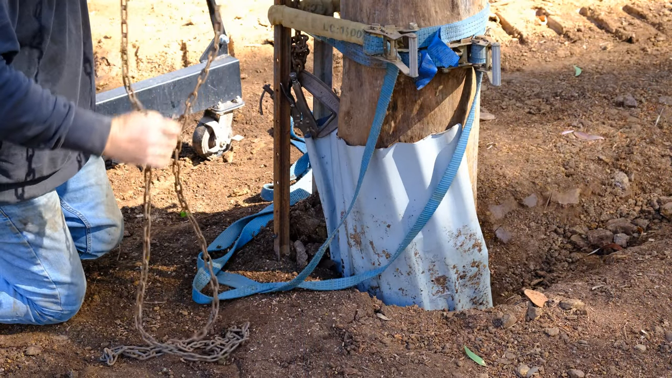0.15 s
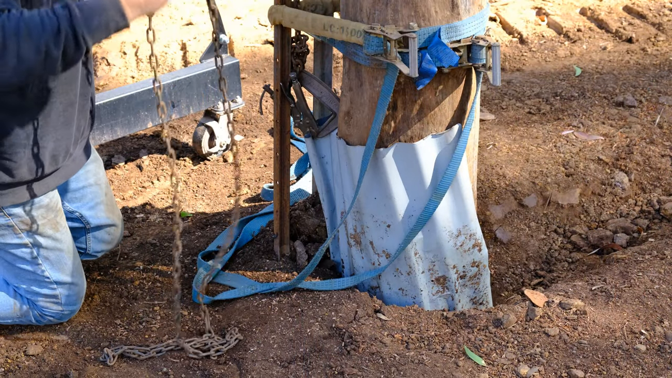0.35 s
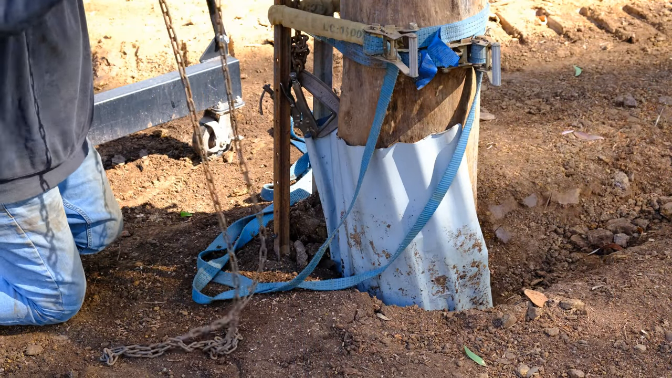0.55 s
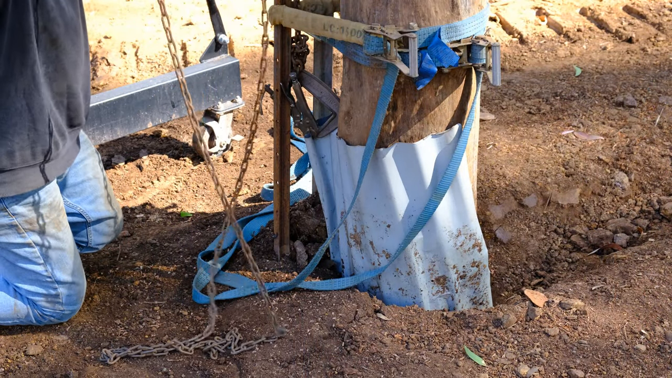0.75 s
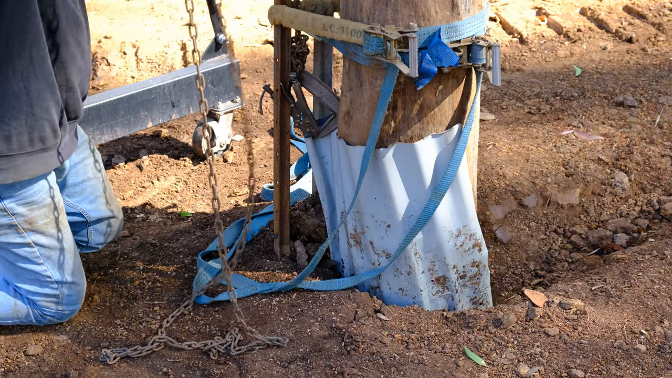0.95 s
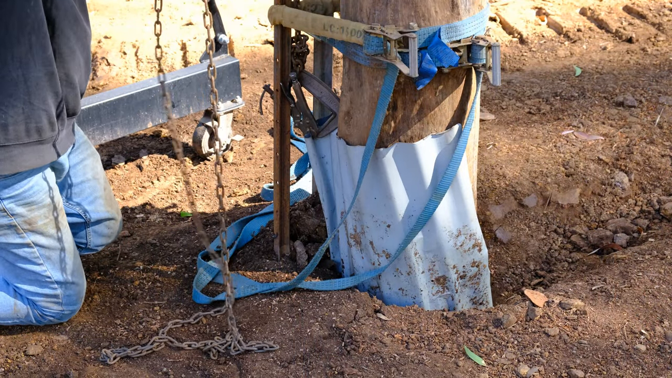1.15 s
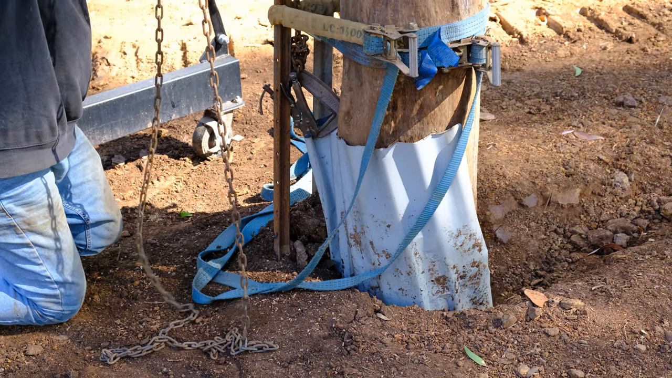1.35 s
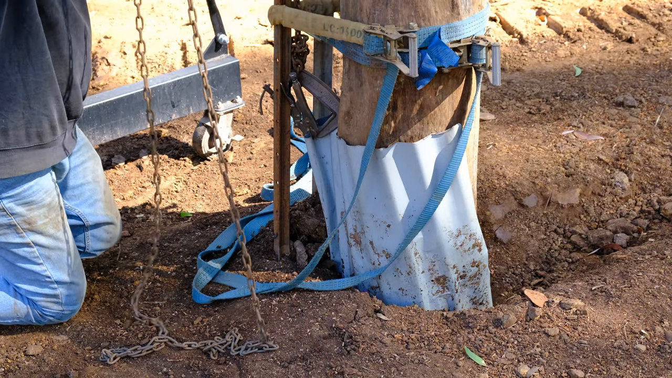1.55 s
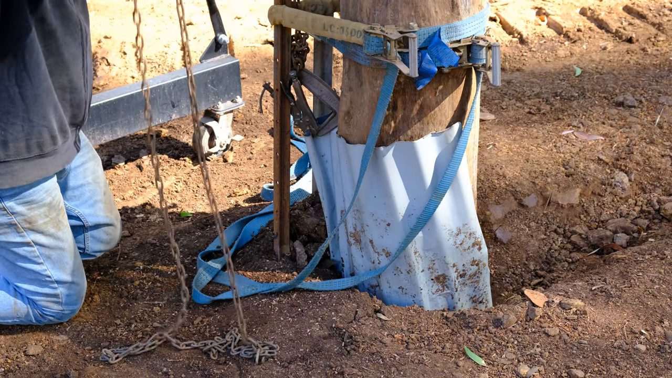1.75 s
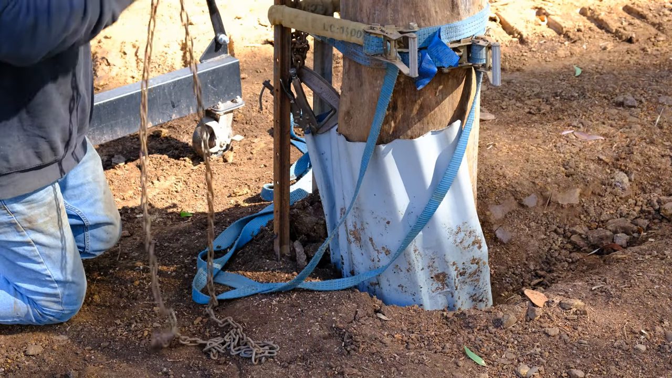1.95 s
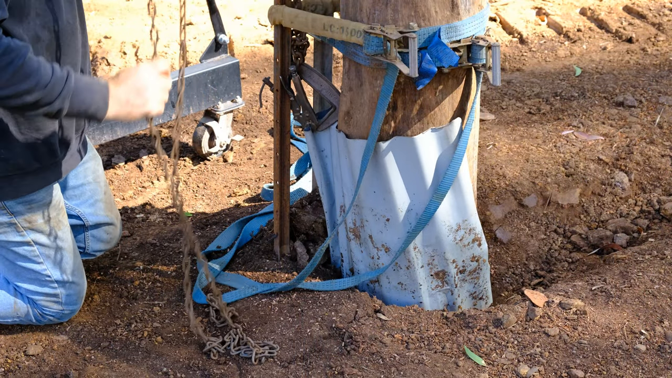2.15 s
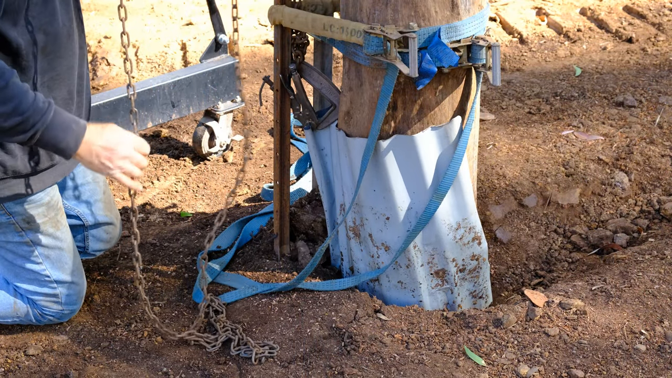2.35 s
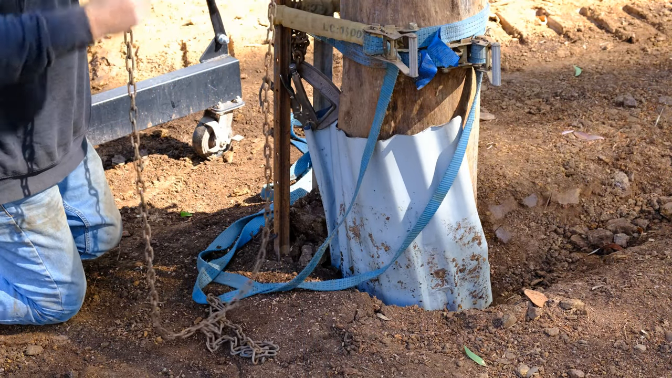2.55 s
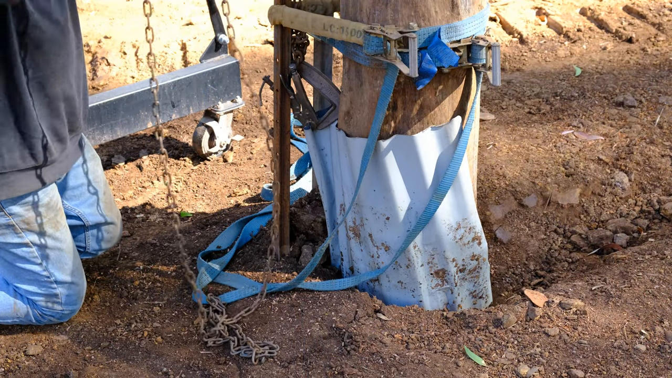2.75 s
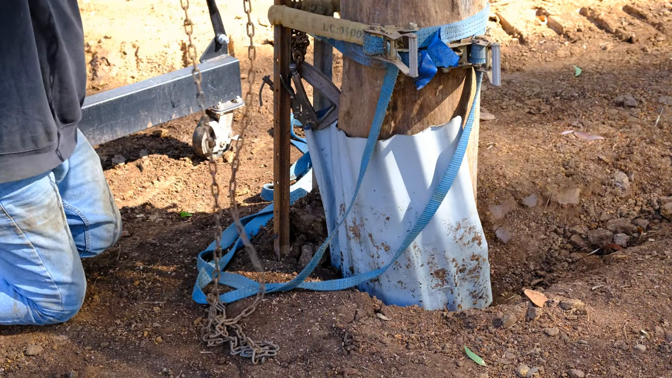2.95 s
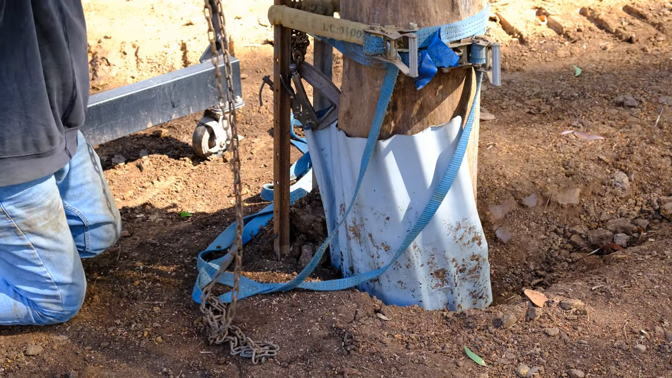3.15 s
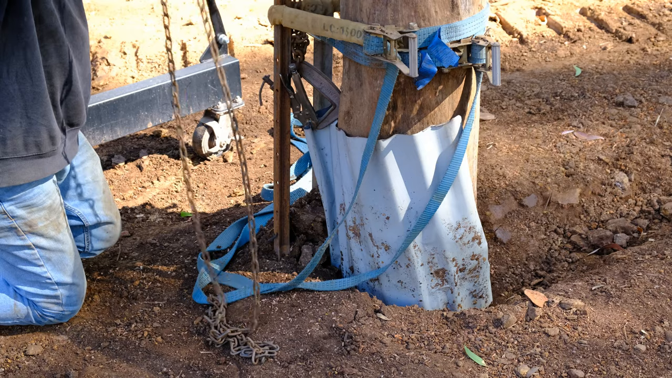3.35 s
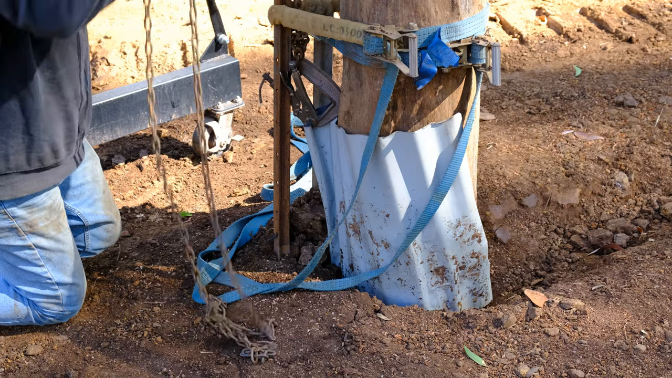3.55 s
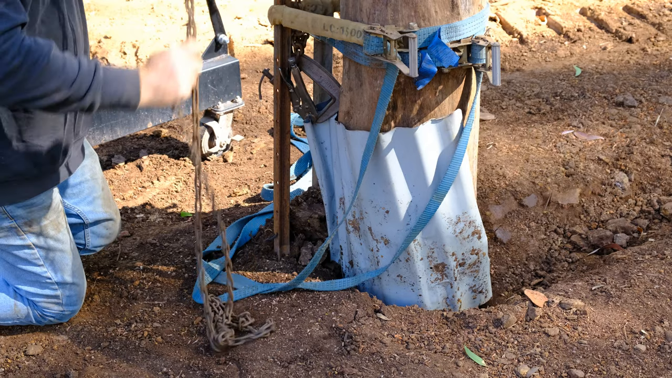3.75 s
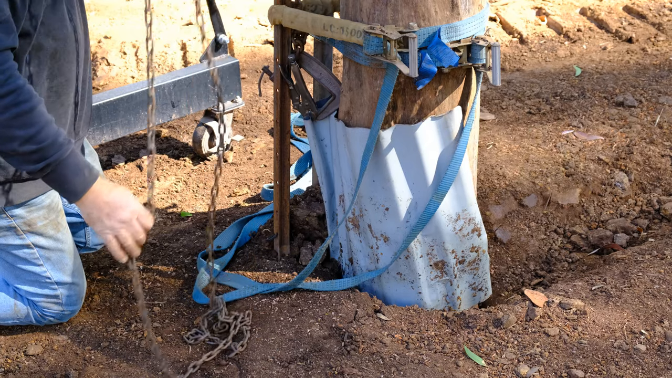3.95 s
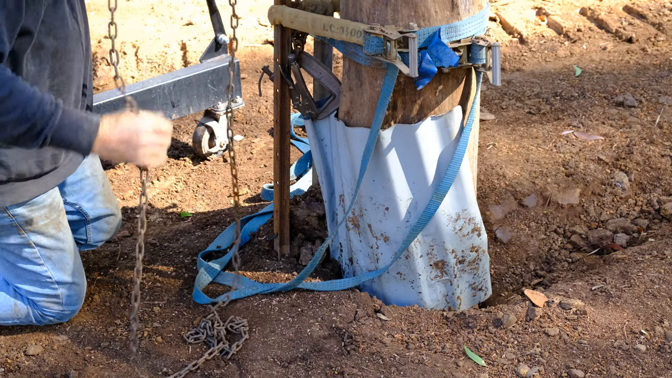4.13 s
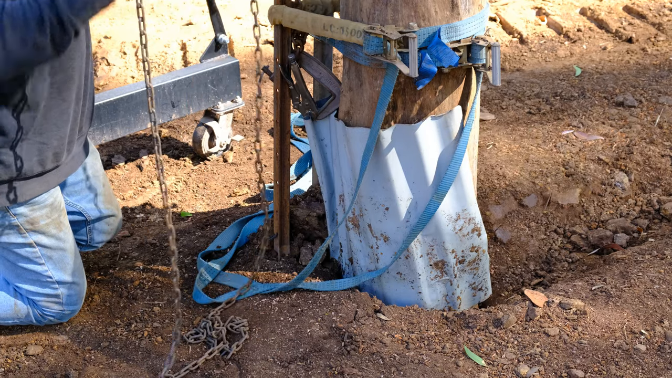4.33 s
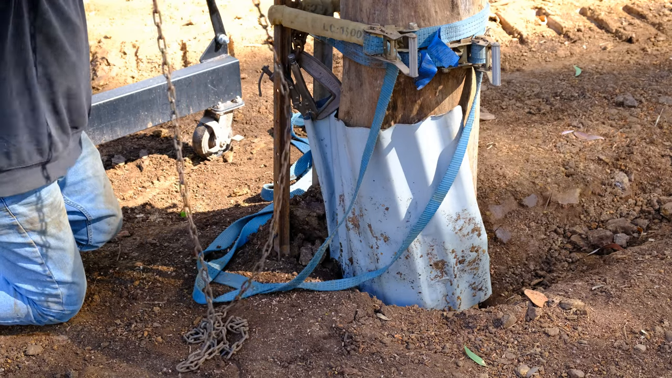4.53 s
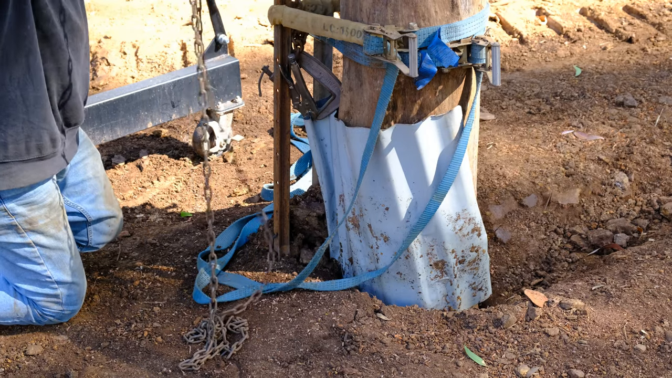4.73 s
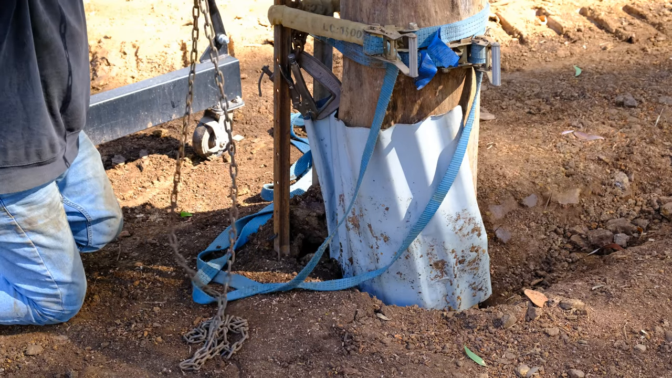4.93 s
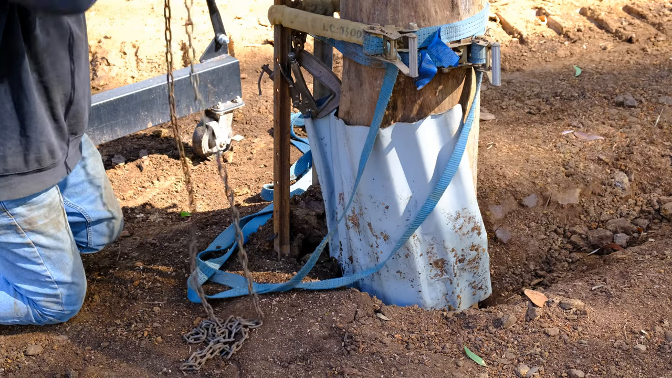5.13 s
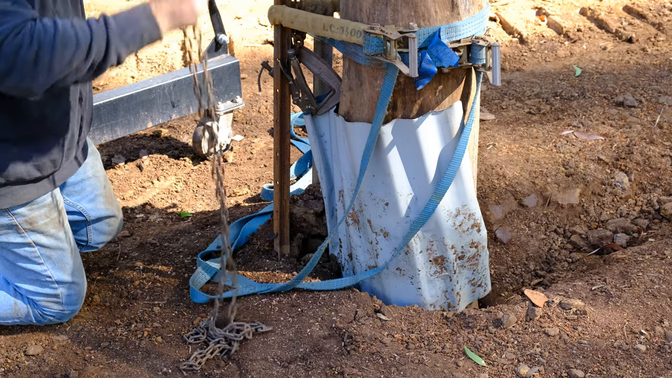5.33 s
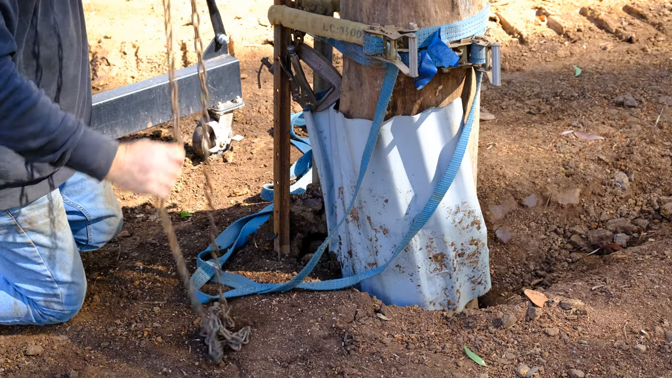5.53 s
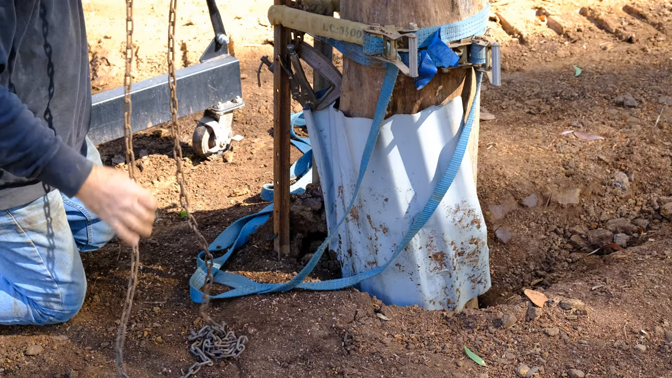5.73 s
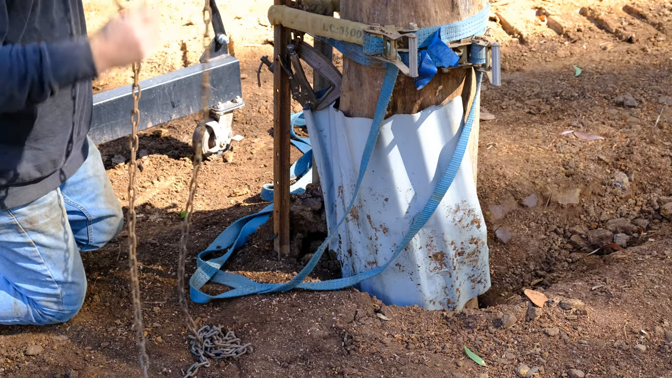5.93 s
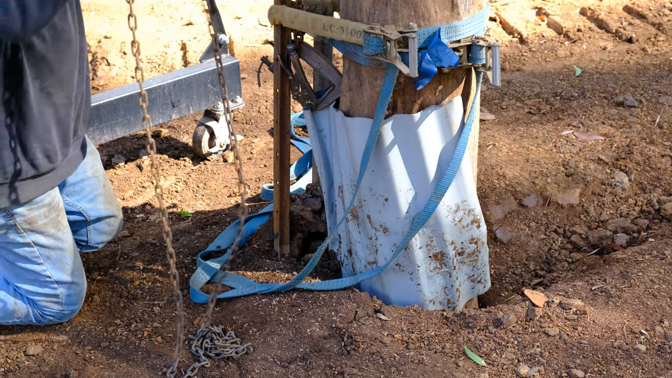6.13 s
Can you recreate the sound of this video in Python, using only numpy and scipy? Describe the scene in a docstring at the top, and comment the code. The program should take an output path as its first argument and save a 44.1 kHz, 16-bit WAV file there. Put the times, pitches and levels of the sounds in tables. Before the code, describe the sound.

Close and dry outdoors, a ratchet is already clicking as it stops, then a clank and loose chain ticks. Three further pulls follow, each a rapid accelerating metallic clatter that slows to a stop, ringing the steel housing. Between them come isolated clanks, cloth and soil rustle, bright link jingles, one sharp strap snap on wood, and tiny far bird whistles over quiet air and soft wind.

```python
"""A hand chain is hauled through a hoist outdoors in pulls: the pawl clicks over ratchet teeth, links rattle the steel housing.
Wheel speed times the clicks and the seating links; shaped noise drives the damped modes of the steel.
The housing also clanks, a loaded strap snaps on a wooden post as decaying sines, and loose links tick as noise bursts.
A far bird gives falling whistles; rustle, fizz, outdoor air and wind are filtered noise.
"""
import sys
import numpy as np
from scipy import signal
from scipy.fft import rfft, irfft, next_fast_len
from scipy.io import wavfile
from scipy.ndimage import uniform_filter1d

SR = 44100
rng = np.random.default_rng(int(sys.argv[2]) if len(sys.argv) > 2 else 0)


def unload_wav(signal):
    """Save mono or channel-first audio to the path in sys.argv[1] as 16-bit WAV at rate SR, clipped to [-1, 1]."""
    wavfile.write(
        sys.argv[1],
        SR,
        np.round(np.clip(np.atleast_2d(signal).T, -1, 1) * 32767).astype(np.int16),
    )


def how_loud(loudness_db):
    """Turn decibels into a plain amplitude multiplier (0 dB gives 1, 20 dB gives 10)."""
    steps = np.asarray(loudness_db, float) / 20
    return 10 ** steps


N = 272538
SIZE = next_fast_len(N + SR // 4)
HZ = np.fft.rfftfreq(SIZE, 1 / SR)
TIME = np.arange(N) / SR
BLOW_TIME = np.arange(SR // 8) / SR
CRUISE_PER_S = 70  # reference wheel speed, teeth per s
# Levels and decays in the tables are relative: the functions that play them weight them further.


def evened(x):
    """Normalization: scales a signal to rms 1."""
    return x / np.sqrt(np.mean(x ** 2) + 1e-20)


def read(points):
    """Spectral interpolation: a table read at every bin on a log-frequency axis."""
    hz, value = np.transpose(points)
    return np.interp(np.log(HZ + 1), np.log(hz + 1), value)


def shaped(x, gain):
    """Linear filtering: multiplies the spectrum by a gain per bin."""
    return irfft(rfft(x, SIZE) * gain, SIZE)[..., :N]


def band(lo_hz, hi_hz):
    """Band-pass response with soft edges."""
    return 1 / np.sqrt((1 + (lo_hz / (HZ + 1)) ** 6) * (1 + (HZ / hi_hz) ** 6))


def noise(gain):
    """Incoherence: two unrelated filtered noises of rms 1."""
    return evened(shaped(rng.standard_normal((2, N)), gain))


def curve(rows):
    """Amplitude envelopes: each dB column as a gain in time, silent outside the rows."""
    s, *columns = np.transpose(rows)
    return how_loud(np.array([np.interp(TIME, s, c, left=-200, right=-200) for c in columns]))


def add(mix, s, sound):
    """Superposition: mixes a sound in at time s, in place."""
    part = mix[..., max(round(s * SR), 0):][..., :sound.shape[-1]]
    part += sound[..., :part.shape[-1]]


def burst(rise, t60):
    """Exponential decay: the envelope of a blow with a short rise and a fall of 60 dB in t60 s."""
    attack = 1 - np.exp(-BLOW_TIME / max(rise, 1e-4))
    return attack * how_loud(-60 * BLOW_TIME / max(t60, .001))


def grains(per_s, spread_db, t60):
    """Shot noise: the rms 1 envelope of many small impacts at random times."""
    sizes = how_loud(spread_db * np.minimum(rng.exponential(1, N), 4))
    hits = (rng.random(N) < per_s / SR) * sizes
    return evened(signal.oaconvolve(hits, burst(0.0027, t60))[:N])


# Near sounds: (frequency [Hz], left-right likeness [0-1])
LIKENESS_NEAR = [(60, 1), (800, 1), (1500, .97), (3100, .88), (6000, .62), (9000, .72), (15000, .62)]
# Spread sounds: (frequency [Hz], left-right likeness [0-1])
LIKENESS_SPREAD = [(60, 0.95), (180, 1.0), (550, 0.99), (1650, 0.59), (4970, 0.084), (15000, 0.066)]
# Level of the left port over the right: (frequency [Hz], level difference [dB])
LEFT_OVER_RIGHT = [(60, 0), (1200, 0), (2000, .5), (3300, 1.5), (5500, 2), (9000, 5), (15000, 1)]
# Phase by which the left port leads for near sounds: (frequency [Hz], phase [rad])
LEFT_LEAD = [(400, 0), (1200, 0), (2500, 0.36), (3960, 0.48), (5170, 1.1), (6030, 0.96), (8440, 1.5),
             (9560, 0.95), (13900, .56), (16200, 3.6)]


def ports(pair, likeness, phase=0., left_db=0.):
    """Partial coherence: two close microphone ports share one part, and the right adds its own."""
    c = np.clip(read(likeness), 0, 1)
    shared, own = rfft(pair, SIZE)
    tilt = how_loud(left_db / 2)
    left = shared * tilt * np.exp(1j * phase)
    right = (c * shared + np.sqrt(1 - c ** 2) * own) / tilt
    return irfft(np.array([left, right]), SIZE)[:, :N]


def passing(rows, teeth):
    """Kinematics: integrates wheel speed to find the times at which given numbers of teeth have passed."""
    s, per_s = np.transpose(rows)
    t = np.arange(s[0], s[-1] + .003, 1 / SR)
    turned = np.cumsum(np.interp(t, s, per_s)) / SR
    return np.interp(teeth[teeth < turned[-1]], turned, t)


# Wheel speed, one list a pull from its first click to its last: (time [s], speed [teeth/s])
SPEED = [
    [(0, 88), (.055, 62), (.091, 42.5)],
    [(1.563, 13), (1.659, 27.4), (1.771, 51.7), (1.899, 66.5), (2.042, 66.9), (2.186, 71.3), (2.282, 60.1),
     (2.362, 21.9)],
    [(3.357, 15), (3.438, 39.1), (3.532, 65.8), (3.64, 84.4), (3.761, 97.5), (3.882, 95.8), (3.963, 68.9),
     (4.03, 32.5)],
    [(5.024, 17), (5.107, 37.2), (5.204, 57.4), (5.315, 80.3), (5.44, 92.9), (5.565, 78.2), (5.649, 59.7),
     (5.718, 33.7)],
]


def pawl():
    """Repeated impact: a click and a weaker bounce per tooth; a slow pawl slides longer before it settles."""
    tire_db_per_s = 5.5  # the pawl strikes softer as the arm runs out of reach
    clicks = np.zeros(N)
    for rows in SPEED:
        times = passing(rows, np.arange(60)) - .001
        luck = rng.standard_normal((len(times), 3))
        for at, gap, (size, late, soft) in zip(times, np.gradient(times), luck):
            at = at + .0003 * late
            db = 1.6 * size - tire_db_per_s * (at - rows[-1][0])
            click = burst(.06 * gap * np.exp(.3 * soft), .016 + .55 * gap)
            add(clicks, at, how_loud(db) * click)
            bounce = how_loud(db - 11 + 3 * late) * burst(.0008, .02)
            add(clicks, at + .3 * gap + .0006 * soft, bounce)
    return clicks


# One row a pull: (turn before the first link seats [teeth], effort [dB], link blow [dB])
PULLS = [(0.89, -0.5, -10), (0.71, -1.5, -3.5), (.56, -1, -1.5), (.33, 0, -2)]
# Pawl click, chain grind, housing hum, frame rumble: (level at cruising speed [dB],
# gain per doubling of speed [dB], take-up before a pull [dB/s], fade after it [dB/s])
LAYERS = [(-44, -1.5, 12.5, 124), (-43, 6, 161, 395), (-49, 1.5, 204, 289), (-50.5, 1.5, 256, 242)]


def hauling():
    """Speed-dependent excitation: layer gains follow the wheel, swell as slack is taken up, fade when it stops."""
    db, per_doubling, take_up, fade = np.transpose(LAYERS)[..., None]
    gains = 0
    for rows, (_, effort_db, _) in zip(SPEED, PULLS):
        s, per_s = np.transpose(rows)
        doublings = np.log2(np.interp(TIME, s, per_s) / CRUISE_PER_S)
        early = np.maximum(s[0] - TIME, 0)
        late = np.maximum(TIME - s[-1], 0)
        gains = gains + how_loud(db + effort_db + per_doubling * doublings - take_up * early - fade * late)
    return gains


# Housing and wheel modes:
# (frequency [Hz], bandwidth [Hz], level when shaken [dB], level when a link seats [dB])
MODES = [(213, 20, -4.5, -32), (365, 49, -9, -16.5), (476, 23, -16.5, -21), (603.4, 20, -3.5, -16),
         (808.6, 77, 6, -3.5), (1426, 22, -11, -28), (1635, 63, -2, -16.5), (1926, 64, -4, 2),
         (2320, 25, -5, -40), (2497, 52, 4, -42), (2990, 29, 6.5, -5), (3004, 20, -28, -9),
         (3200, 220, -5, -33), (3396, 71, -5, 2), (3680, 66, -0.5, -6), (4246, 190, -7, -23),
         (4930, 36, 0, -8), (5290, 29, -7, -9.5), (5894, 44, -6, -6), (6640, 40, -4, -11),
         (8540, 100, -0.5, -15), (10870, 590, -9.5, -24)]
# Direct sound of steel on steel: (frequency [Hz], level [dB])
CRACK = [(35, -61), (60, -45), (256, -8.5), (315, 0.5), (500, -8.5), (680, -22), (803, -8.5), (1170, -9),
         (1620, -0.5), (2970, -2), (5590, -6.5), (11000, -11.5), (15200, -10), (16000, -81)]


def housing(envelopes):
    """Modal resonance: noise, one envelope a band, drives a direct crack and modes of wandering strength."""
    edges = [0, 650, 1300, 6000, SR]  # Hz
    crack = how_loud(read(CRACK) - 6.0)
    ring = sum(how_loud(db) ** 2 / (1 + (2 * (HZ - hz) / width) ** 2) for hz, width, db, _ in MODES)
    drive = np.zeros((2, N))
    for env, lo, hi in zip(envelopes, edges, edges[1:]):
        passed = band(lo, hi)
        response = np.sqrt(np.mean(passed ** 2 * (crack ** 2 + ring)))
        drive += shaped(env * rng.standard_normal((2, N)), passed / response)
    out = shaped(drive, crack)
    for hz, width, db, _ in MODES:
        pole = np.exp((2j * np.pi * hz - np.pi * width) / SR)
        wander_db = 1.9 * np.interp(TIME, np.arange(400) * 0.014, rng.standard_normal(400))
        struck = drive * how_loud(wander_db - 6.0)
        out += 2 * how_loud(db) * signal.lfilter([1 - abs(pole)], [1, -pole], struck).real
    return out


def hoist():
    """Common resonator: pulls and single blows all shake the same housing."""
    click, grind, hum, rumble = hauling()
    clicks, seated = pawl(), seats()
    # from the lowest band to the highest
    envelopes = np.array([
        rumble * (0.23 * grains(42, 0.9, 0.1) + 0.5),
        hum * (0.61 * clicks + 1.0 * grains(57.7, 0.3, 0.051) + 0.41),
        1.91 * click * clicks + grind * (0.42 * grains(260, 0.43, 0.037) + 0.35),
        3.09 * click * clicks + grind * (0.13 * grains(200, 4.2, 0.0088) + 0.24)])
    seat_knocks(envelopes, seated)
    clanks(envelopes)
    thuds(envelopes)
    return housing(envelopes) + wheel(seated)


# Spectrum of the outdoor air: (frequency [Hz], level [dB])
AIR = [(12, -34), (20, -63), (116, -6), (377, 6), (642, -15.5), (897, 5.5), (1150, -30), (1960, -2),
       (7950, -19), (14300, -16), (16000, -26)]


def air():
    """Stationary noise: steady outdoor air with a fixed spectrum."""
    return ports(how_loud(-68) * noise(how_loud(read(AIR))), LIKENESS_SPREAD, left_db=read(LEFT_OVER_RIGHT))


# Wind: (time [s], level [dB])
WIND = [(0, -89), (.5, -70.5), (.96, -83), (1.04, -64), (1.07, -69), (1.17, -86), (1.31, -71), (1.7, -89),
        (2.5, -79), (2.96, -69), (3.35, -77), (4.1, -83), (4.68, -67), (4.78, -82), (4.94, -75), (5.6, -86),
        (6.18, -65.5)]


def wind():
    """Amplitude modulation: low noise, alike at both ports, swells in random lumps."""
    lumps_db = 0.5 * np.interp(TIME, np.arange(200) * .08, rng.standard_normal(200))
    return curve(WIND) * how_loud(lumps_db) * noise(band(16, 117))[0]


# Slack chain swinging back against the wheel: (time [s], level [dB], extra ring of the rim [dB])
SWINGS = [(1.1184, -32, -9), (5.8094, -36, 12)]


def seats():
    """Impact energy: links drop into the wheel at even turns, harder at speed; rows like SWINGS."""
    teeth_per_link = 2.59
    rows = []
    for speed, (first, _, blow_db) in zip(SPEED, PULLS):
        times = passing(speed, first + teeth_per_link * np.arange(24))
        size, rim, late = rng.standard_normal((len(times), 3)).T
        doublings = np.log2(np.interp(times, *np.transpose(speed)) / CRUISE_PER_S)
        db = -23 + blow_db + 10.5 * doublings + 1.5 * size
        rows += zip(times + .001 * late, db, 2.5 * rim)
    return rows + SWINGS


def seat_knocks(envelopes, seated):
    """Forced vibration: each wheel blow also shakes two middle bands of the housing."""
    for s, db, _ in seated:
        add(envelopes[2], s, how_loud(db - 13) * burst(.00075, .015))
        add(envelopes[1], s, how_loud(db - 22.5) * burst(0.0032, 0.074))


def wheel(seated):
    """Free vibration: each link or swinging-chain blow lets the modes ring out as decaying sines."""
    out, t = np.zeros((2, N)), BLOW_TIME
    hz, width, _, seat_db = np.transpose(MODES)[..., None]
    rim = abs(hz / 3000 - 1) < .04  # modes near 3000 Hz take the extra rim level
    for s, db, rim_db in seated:
        size, turn, other = rng.standard_normal((len(MODES), 3)).T[..., None]
        gain = how_loud(db - 13.5 + seat_db + rim * rim_db + 3.3 * size)
        rings = gain * np.exp(-np.pi * width * t) * np.minimum(t / .0015, 1)
        pair = [(rings * np.sin(2 * np.pi * hz * t + 4 * p)).sum(0) for p in (turn, other)]
        add(out, s, np.array(pair))
    return out


# Blows on the housing: (time [s], level [dB], hum level [dB], treble level [dB], decay [s])
CLANKS = [(0.0795, -20.5, -52, -22, 0.022), (0.1744, -67, -50, -66, 0.044),
          (0.2669, -28.5, -35.5, -41, 0.07), (0.519, -33, -69, -40, 0.066),
          (0.5474, -40, -49.5, -75, 0.048), (0.605, -49, -59, -67, 0.23),
          (1.0468, -30, -46.5, -33.5, 0.035), (1.0634, -57, -49.5, -69, 0.15),
          (1.1201, -25.5, -40.5, -26, 0.035), (1.151, -38.5, -60, -56, 0.02), (1.19, -48, -63, -74, 0.24),
          (1.3209, -46, -55, -56, .026), (1.349, -37, -37, -77, 0.023), (1.4394, -19.5, -36, -28, 0.031),
          (1.5394, -35, -57, -77, 0.027), (1.5933, -54, -76, -56, 0.0092), (1.8158, -28, -27, -41, 0.018),
          (2.4426, -32, -38, -41.5, 0.1), (2.589, -46, -66, -72, 0.051), (2.9512, -63, -49, -68, 0.075),
          (3.156, -39, -54.5, -68, 0.05), (3.302, -45, -68, -72, 0.072), (3.329, -47, -50, -72, 0.18),
          (4.162, -44, -48.5, -66, 0.095), (4.2229, -40, -36, -69, 0.061), (4.238, -32, -51, -43, 0.071),
          (4.362, -52, -47, -79, 0.028), (4.4543, -31.5, -37.5, -69, 0.025),
          (4.7575, -43.5, -82, -45, 0.039), (4.8724, -31.5, -61, -49, 0.032),
          (4.8817, -35.5, -41, -73, 0.024), (5.015, -25, -64, -76, 0.03), (5.8064, -34.5, -78, -38.5, 0.06),
          (5.941, -30, -37.5, -48, 0.036), (5.974, -46, -51, -76, 0.088), (6, -39.5, -55, -66, .054)]


def clanks(envelopes):
    """Impulsive excitation: blows drive the three upper bands, each with its own rise and decay."""
    for s, db, hum_db, treble_db, t60 in CLANKS:
        first = 1 + 0.4 * burst(.0001, 0.0056)  # the first contact is the hardest
        decays = [burst(0.00049, 1.12 * t60), first * burst(0.0011, t60), first * burst(0.0016, 0.5 * t60)]
        add(envelopes[1:], s, how_loud([[hum_db + 4.0], [db - 9.5], [treble_db + 0.5]]) * decays)


# Cloth, soil and slack chain: (time [s], rustle level [dB], fizz level [dB])
RUSTLE = [(.08, -76, -60), (.274, -54, -65), (.35, -65.5, -70.5), (.5, -63.5, -70.5), (.722, -66.5, -69),
          (.87, -73, -86), (1.244, -67.5, -74.5), (1.362, -61, -84), (1.54, -89, -104), (2.36, -93, -59),
          (2.43, -56.5, -70), (2.694, -70.5, -74), (2.96, -61.5, -76.5), (3.212, -65, -70),
          (3.36, -66, -85), (4.05, -69.5, -61), (4.216, -54, -70), (4.372, -61, -74.5), (4.95, -69.5, -80),
          (5.72, -62.5, -56), (5.938, -62, -73.5), (6.18, -61, -71.5)]


def rustling():
    """Granular friction: a low rustle and a bright fizz close by, broken into random grains."""
    rustle, fizz = curve(RUSTLE)
    near = rustle * noise(band(250, 1800)) * (.6 + .45 * grains(80, 3., .08))
    near += fizz * noise(band(2350, 8300)) * (1.16 + .5 * grains(110, 12.0, 0.0052))
    return ports(near, LIKENESS_SPREAD, left_db=read(LEFT_OVER_RIGHT))


# Loose links touching: (time [s], level [dB], decay [s])
TICKS = [(0.139, -47, 0.012), (0.1775, -54, 0.0089), (0.2254, -50, 0.01), (0.3257, -44, 0.0098),
         (0.3546, -50, 0.012), (0.3723, -39.5, 0.016), (0.3884, -45, 0.012), (0.4803, -48, 0.0087),
         (0.631, -48, 0.012), (0.6536, -33.5, 0.013), (0.669, -40.5, 0.021), (0.7055, -54, 0.019),
         (0.7297, -43, 0.01), (0.774, -35, 0.012), (0.7976, -46, 0.012), (0.835, -37.5, 0.018),
         (2.6245, -38.5, 0.013), (2.6517, -41, 0.012), (2.7056, -43.5, 0.011), (2.7423, -43, 0.012),
         (2.8493, -43, 0.0092), (3.175, -38.5, 0.022), (3.2126, -40, 0.015), (3.2272, -47, 0.012),
         (3.287, -43, 0.012), (3.3119, -43, 0.011), (4.0696, -49, 0.012), (4.133, -42, 0.014),
         (4.1716, -44, 0.015), (4.267, -47, 0.012), (4.623, -42.5, 0.01), (4.6404, -44, 0.012),
         (4.804, -50, 0.009), (4.9551, -50, 0.012), (5.8576, -50, 0.012), (6.0082, -45, 0.012)]
# Spectrum of a tick: (frequency [Hz], level [dB])
TICK_SPECTRUM = [(590, -36), (1000, -2), (3150, -9.5), (3930, -2), (7980, -2.5), (14900, 4), (16000, -8)]


def links():
    """Bouncing contact: bright ticks with ever softer bounces, and many fainter ones that follow the fizz."""
    contact_s = 0.0018  # decay of a sharp touch
    touch = burst(.0001, contact_s)
    env = how_loud(-3) * curve(RUSTLE)[1] * grains(100, 5., contact_s)
    gaps = rng.uniform(0.38, 1.56, (len(TICKS), 4))
    for (s, db, t60), late in zip(TICKS, gaps):
        add(env, s, how_loud(db - 6) * (burst(0.00041, t60) + how_loud(3) * touch))
        for k, gap in enumerate(np.cumsum(late), 1):
            add(env, s + .0035 * gap, how_loud(db - 2.5 * k) * touch)
    return ports(noise(how_loud(read(TICK_SPECTRUM))) * env, LIKENESS_NEAR, read(LEFT_LEAD), left_db=4)


# Jolts through the frame: (time [s], level [dB], decay [s])
THUDS = [(0.2667, -33, 0.088), (0.521, -49, 0.37), (.7544, -49, 0.06), (1.0474, -48, 0.073),
         (1.8154, -21.5, 0.026), (2.4424, -38, 0.17), (2.9512, -52, 0.13), (4.2376, -41, 0.12),
         (4.438, -53.5, 0.056), (5.937, -34, 0.12), (5.99, -48.5, 0.17)]


def thuds(envelopes):
    """Structure-borne shock: jolts drive the lowest band of the housing."""
    for s, db, t60 in THUDS:
        add(envelopes[0], s, how_loud(db) * burst(0.0066, t60))


# Strap slipping on the post: (time [s], level [dB], ring against snap [dB])
SNAPS = [(.914, -33, -1), (1.3554, -30, -7.5), (2.9805, -47.5, 3), (4.7025, -13.5, -20)]
# Modes of the post, detuned a little at each snap: (frequency [Hz], level [dB], decay by 60 dB [s])
POST = [(465, -18.5, 0.15), (957, -13.5, 0.1), (1386, 2, 0.052), (1534, 4, 0.0094), (2040, -1, 0.043),
        (1940, -22.5, 0.068), (2090, -8, 0.03), (4010, -45, 0.017)]


def strap():
    """Stick-slip: a creak, a sharp snap of one and a half swings, then post modes over a rough, duller tail."""
    out, t = np.zeros((2, N)), BLOW_TIME
    u = t - .0007
    pulse = np.cos(2 * np.pi * 2500 * u + .5) * np.exp(-(u / .00019) ** 2)
    snap = pulse * np.array([[1], [.3]])  # part shared by both ports, part of the right port alone
    creak, clack = noise(band(840, 1400)), noise(band(790, 1680))
    for s, db, ring_db in SNAPS:
        ring = 0
        for (hz, level_db, t60), (a, b) in zip(POST, rng.random((len(POST), 2))):
            swing = np.sin(2 * np.pi * (hz * (.985 + .03 * a) * t + b))
            ring = ring + how_loud(level_db - 60 * t / t60) * swing
        rough = 1 + 2.0 * uniform_filter1d(rng.standard_normal((2, len(t))), 30)
        start = round(s * SR)
        tail = clack[:, start:][:, :len(t)] * (.7 * burst(.0005, .04) + .2 * burst(.004, .12))
        body = ring * rough * np.minimum(t / 0.00086, 1) + tail
        add(out, s, how_loud(db) * (snap + how_loud(ring_db) * body))
        # the strap creaks before it lets go
        add(out, s - .016, how_loud(db - 31.0) * creak[:, start:][:, :700] * np.hanning(700))
    return shaped(out, band(330, 15000))


# Chirps of the bird: (time [s], level [dB])
CHIRPS = [(4.384, -57.5), (4.543, -58), (4.623, -54), (4.787, -70), (4.947, -56.5)]


def bird():
    """Frequency modulation: short falling whistles from far off, made slightly hoarse by a noisy level."""
    out = np.zeros(N)
    count = round(0.0254 * SR)
    pitch = np.linspace(3000, 2050, count)  # Hz
    call = np.sin(2 * np.pi * np.cumsum(pitch) / SR) * np.hanning(count)
    for s, db in CHIRPS:
        add(out, s, how_loud(db) * call)
    return out * (.8 + 2.5 * uniform_filter1d(rng.standard_normal(N), 40))


def scene():
    """Superposition: hoist, post and links close to the ports, the bird far, the rest spread around."""
    near = ports(hoist() + strap(), LIKENESS_NEAR, read(LEFT_LEAD), left_db=read(LEFT_OVER_RIGHT))
    return near + air() + wind() + rustling() + links() + bird()


def low_pass(x):
    """Removes everything above the highest recorded frequency."""
    return signal.sosfilt(signal.butter(12, 16660, fs=SR, output="sos"), x)


def record(dry):
    """Signal chain: the finished mix passes through one last stage."""
    return low_pass(dry)


dry = scene()
out = record(dry)
unload_wav(out)
```